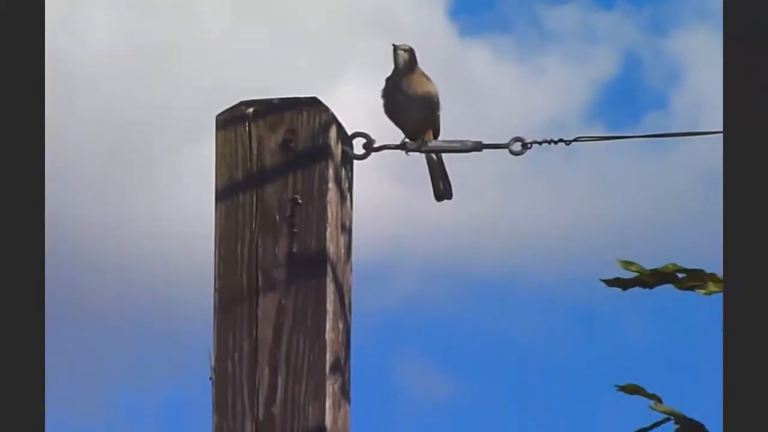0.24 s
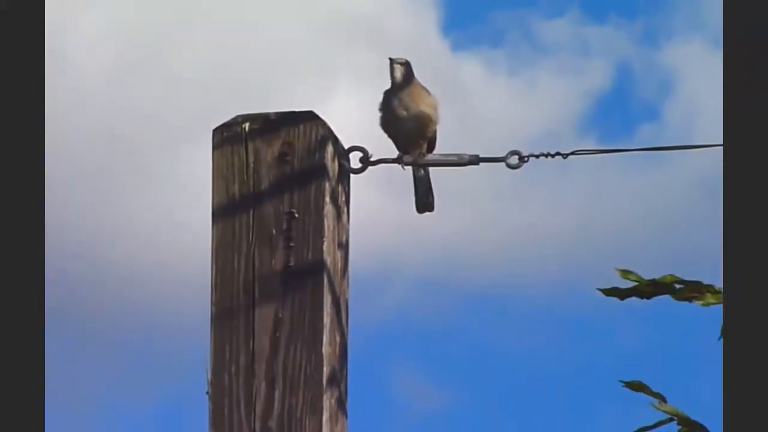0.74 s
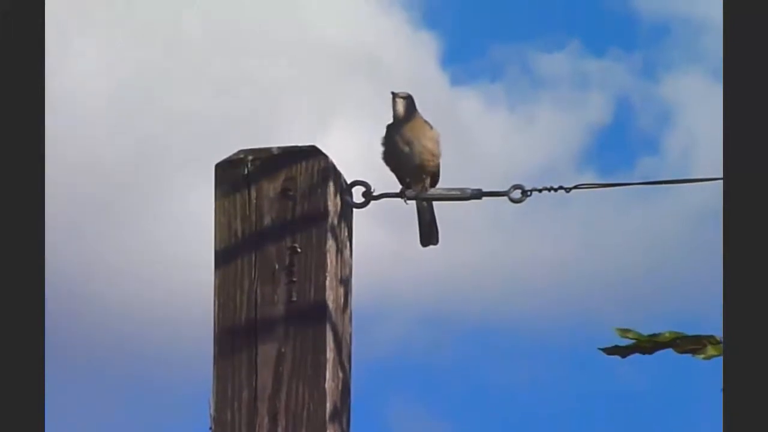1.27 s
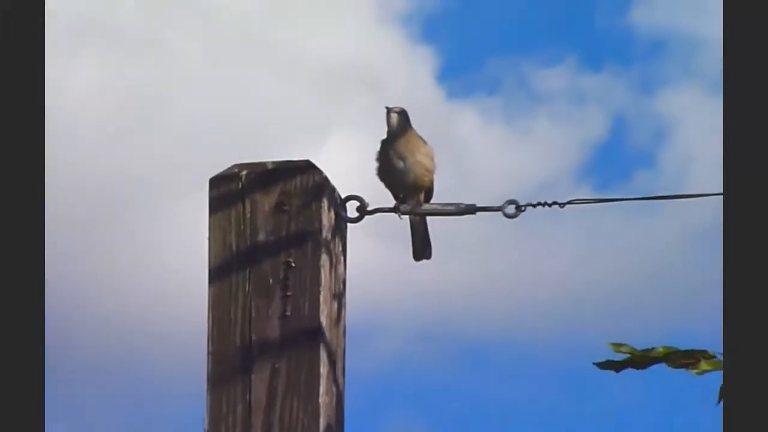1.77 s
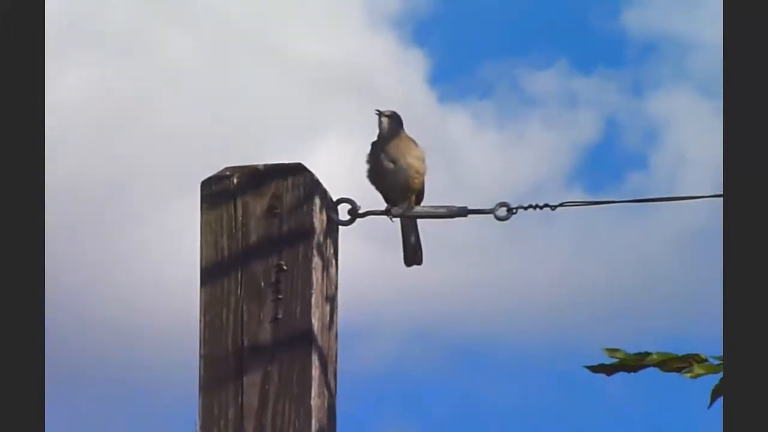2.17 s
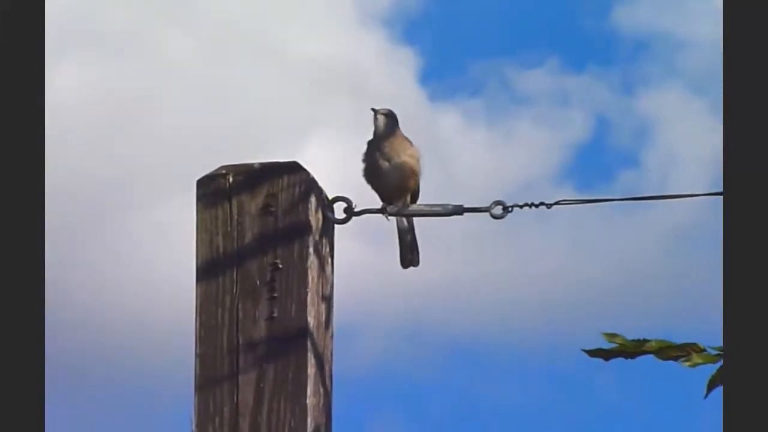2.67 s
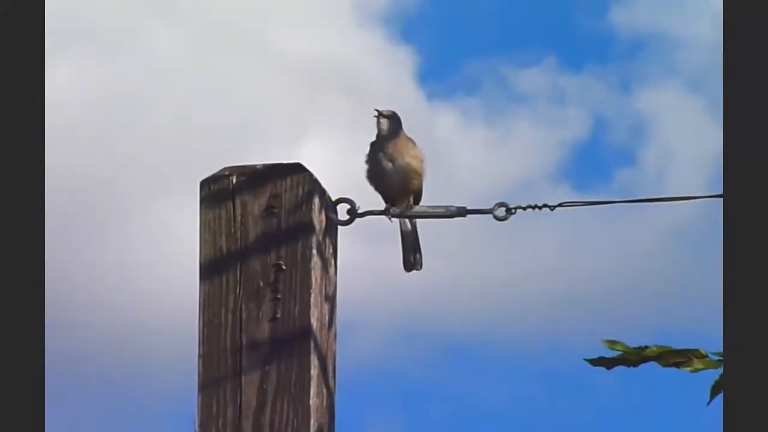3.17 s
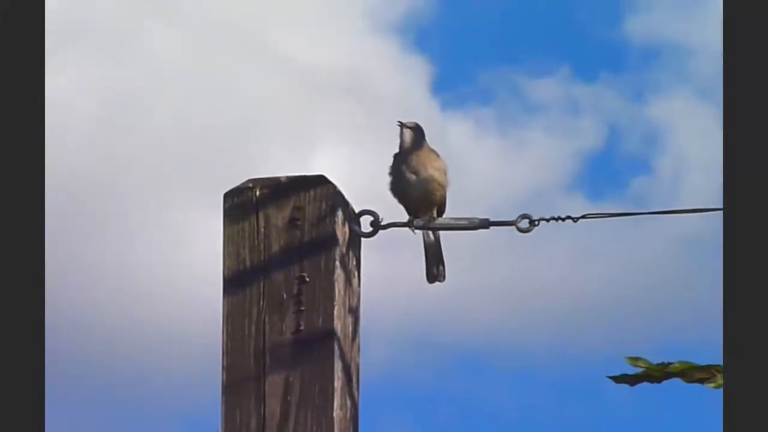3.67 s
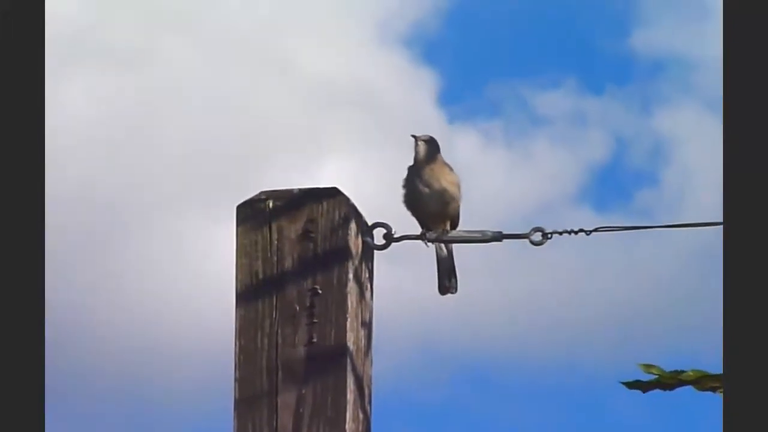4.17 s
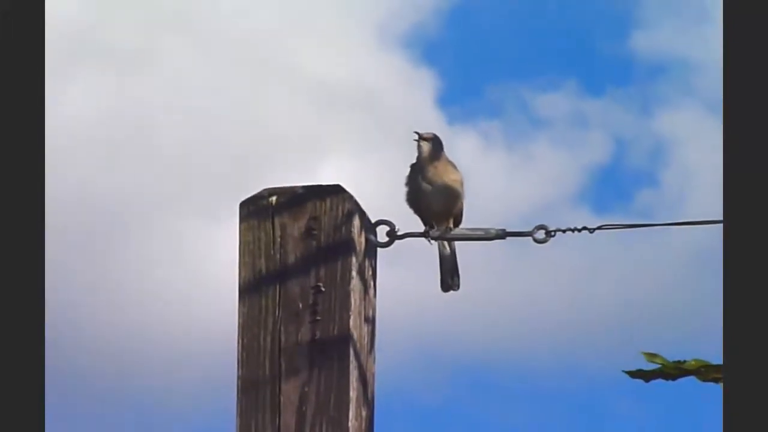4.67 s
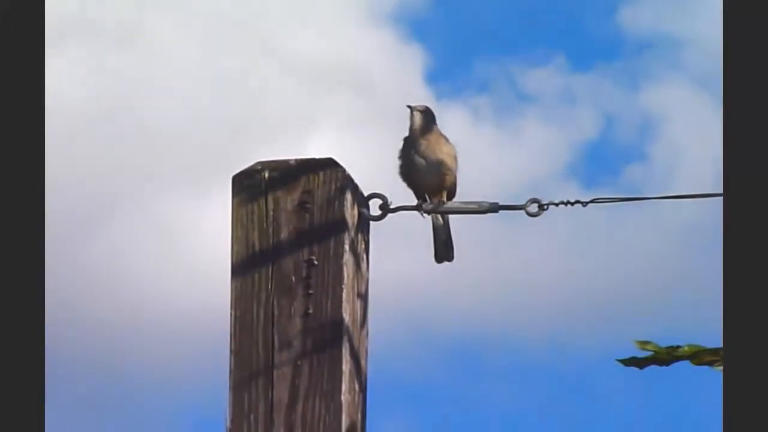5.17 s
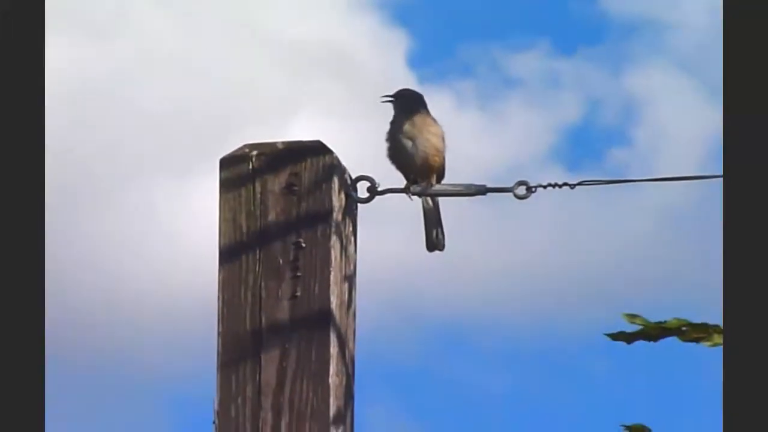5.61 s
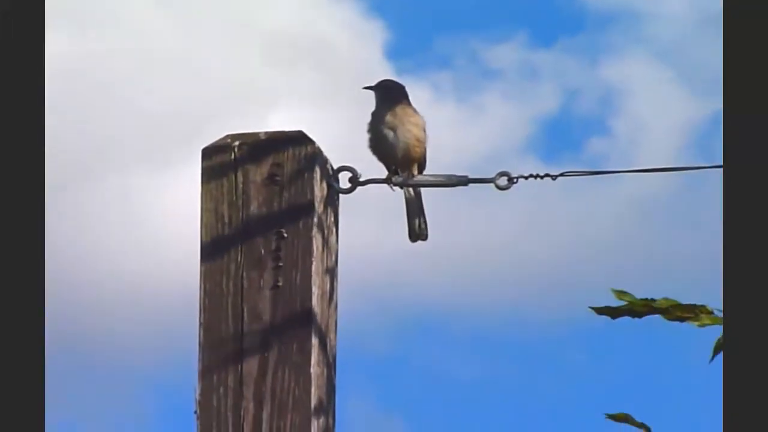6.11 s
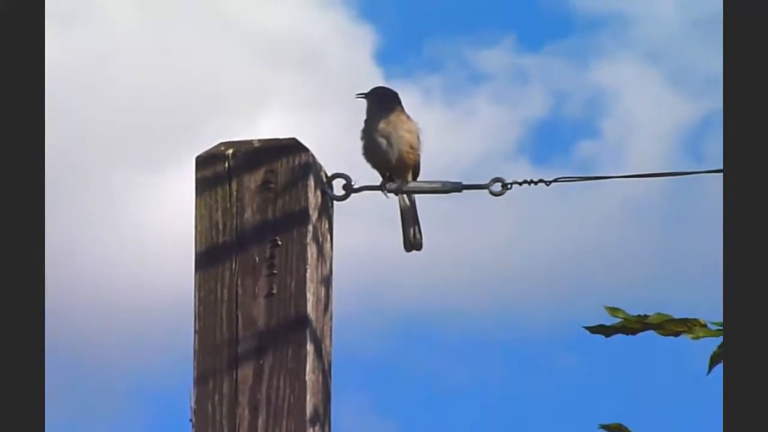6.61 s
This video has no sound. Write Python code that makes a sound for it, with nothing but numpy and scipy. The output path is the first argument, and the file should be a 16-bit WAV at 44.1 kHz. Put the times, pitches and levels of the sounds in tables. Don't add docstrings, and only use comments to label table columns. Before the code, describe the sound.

Outdoors, broad distant traffic roar with low engine drones runs throughout, beneath faint air hiss and a high cricket trill. After almost a second a perched songbird gives a soft row of ticks, then raspy chatter, bursts of rising chirps, and long rough sliding whistles, pausing between phrases. A last short wavering note closes it. A modest camera microphone catches the bird at some distance, with slight open-air echoes and a grainy treble.

```python
import sys
import numpy as np
from scipy import signal
from scipy.fft import rfft, irfft, next_fast_len
from scipy.io import wavfile
from scipy.ndimage import uniform_filter1d

SR = 44100
rng = np.random.default_rng(int(sys.argv[2]) if len(sys.argv) > 2 else 0)


def wrap_up_sound(samples):
    columns = np.atleast_2d(samples).T
    tamed = np.clip(columns, -1, 1)
    steps = np.round(tamed * 32767).astype(np.int16)
    wavfile.write(sys.argv[1], SR, steps)


def level_to_linear(level):
    exponent = np.asarray(level, float) / 20
    return 10 ** exponent


N = 302085
TIME = np.arange(N) / SR


def bird():
    return ticks() + rasp() + chatter() + chirps() + whistles()


# [t/s, peak level/dB, pitch f/Hz, reached f/Hz]
TICKS = [(0.8996, -27, 2310, 2950), (0.954, -25.5, 2400, 2380), (1.012, -30, 2520, 2700),
         (1.0671, -27, 2510, 2420), (1.1173, -28, 2430, 2450), (1.1712, -26.5, 2410, 2370),
         (1.223, -24.5, 2420, 2500), (1.28, -28, 2490, 2850), (1.334, -28, 2650, 2850),
         (1.3894, -26, 2440, 2900), (1.4494, -24, 2400, 2650), (1.5038, -25.5, 2300, 2450)]


def ticks():
    notes = []
    for s, db, hz, reach_hz in TICKS:
        start = (s, hz * 0.957, db - 4.5)
        middle = (s + 0.0028, hz, db - 1.5)
        end = (s + 0.0069, reach_hz, db - 9.5)
        notes.append([start, middle, end])
    return sing(notes, rough=0.59, breath_db=-33, octave_db=-6)


# [top t/s, flick from f/Hz, top f/Hz, fall to f/Hz, level/dB]
CHATTER = [(2.0135, 4010, 3800, 2480, -26), (2.043, 3640, 4010, 2600, -29), (2.057, 3890, 3990, 2730, -37),
           (2.102, 2950, 4140, 2450, -25), (2.132, 3990, 4030, 2480, -31), (2.146, 3500, 3600, 3300, -35),
           (2.199, 2840, 3820, 2540, -26), (2.225, 3580, 3850, 2520, -31), (2.236, 2840, 2950, 2320, -32),
           (2.28, 2750, 4270, 2480, -25), (2.315, 3300, 3960, 2500, -28), (2.329, 2940, 3400, 2400, -31),
           (2.399, 2580, 3540, 2240, -24.5), (2.436, 3200, 4320, 2500, -30), (2.452, 2700, 4250, 2940, -31),
           (2.504, 2720, 4700, 2900, -26), (2.516, 4420, 4640, 2620, -32), (2.538, 2560, 4700, 2940, -31),
           (2.547, 3490, 3580, 2610, -33)]


def chatter():
    return sing(flicks(CHATTER), rough=1.8, breath_db=-21, octave_db=-7.0)


FLICK_S, FALL_S = 0.0045, 0.007
FLICK_DB, TOP_DB, LANDING_DB = -5, -1, -5
SHADOW_S, SHADOW_RISE, SHADOW_DB = 0.0057, 1.12, -13


def flicks(rows):
    notes = []
    for s, from_hz, top_hz, to_hz, db in rows:
        notes.append(np.array([
            (s - FLICK_S, from_hz, db + FLICK_DB),
            (s, top_hz, db + TOP_DB),
            (s + FALL_S / 2, (top_hz + to_hz) / 2, db),
            (s + FALL_S, to_hz, db + LANDING_DB)]))
    shadows = [note[1:] * [1, SHADOW_RISE, 1] + [SHADOW_S, 0, SHADOW_DB] for note in notes]
    return notes + shadows


# [t/s, length/s, level/dB]
RASP = [(2.008, 0.012, -46), (2.036, 0.031, -35), (2.091, 0.016, -39), (2.13, 0.025, -46),
        (2.186, 0.017, -43), (2.22, 0.023, -42), (2.27, 0.011, -39), (2.306, 0.032, -33),
        (2.393, 0.02, -33), (2.422, 0.039, -37), (2.492, 0.035, -33), (2.529, 0.03, -36)]
# [f/Hz, level/dB per Hz]
RASP_COLOUR = [(1800, -29), (2400, -1), (3600, 0.5), (4500, -5), (5500, -18), (6500, -39)]


def rasp():
    level = np.zeros(N)
    for s, span, db in RASP:
        level += level_to_linear(db) * np.sin(np.pi * np.clip((TIME - s) / span, 0, 1))
    grain = level_to_linear(3 * flutter(100, 400))
    return level * noise(RASP_COLOUR) * grain


# [t/s, length/s, from f/Hz, to f/Hz, peak level/dB]
CHIRPS = [(3.022, 0.016, 3120, 4040, -24.5), (3.05, 0.022, 2720, 4150, -24), (3.08, .019, 3340, 3800, -23),
          (3.17, 0.021, 2710, 4450, -21), (3.199, .016, 3260, 4170, -26), (3.221, 0.013, 2990, 4270, -25),
          (3.242, .010, 3330, 4000, -30), (3.287, .016, 3250, 4050, -26.5), (3.306, .008, 3900, 3980, -34),
          (3.316, 0.014, 2750, 4100, -27), (3.33, 0.0062, 3500, 2750, -32),
          (3.335, 0.011, 2710, 3800, -22.5), (3.343, 0.022, 3690, 4020, -24.5),
          (3.044, 0.0083, 3080, 2650, -27.5), (3.1, 0.019, 3420, 3700, -41),
          (3.999, 0.02, 2780, 4170, -19.5), (3.37, .012, 3100, 3950, -24), (3.364, .007, 4000, 3100, -31),
          (3.385, 0.013, 3130, 3530, -30.5), (3.251, .007, 4050, 3100, -35)]
# [t/s, length/s, from f/Hz, to f/Hz, peak level/dB]
LATER_CHIRPS = [(3.62, 0.028, 3200, 4330, -22), (3.653, 0.019, 3400, 4300, -26),
                (3.677, 0.013, 3380, 4050, -24), (3.732, 0.026, 3210, 4190, -21),
                (3.767, 0.016, 3230, 4310, -21), (3.791, 0.016, 3380, 4300, -23.5),
                (3.81, 0.0097, 3020, 3740, -24), (3.869, 0.024, 3380, 4320, -18),
                (3.902, 0.024, 3180, 4050, -19), (3.934, .016, 3320, 3580, -27),
                (4.055, 0.011, 3850, 4800, -32), (4.026, 0.018, 3550, 3900, -17),
                (4.046, 0.016, 3345, 3930, -18.5), (4.066, 0.0112, 3170, 3800, -22.5),
                (4.077, 0.0058, 3230, 3540, -19), (4.088, 0.0075, 3300, 3660, -33)]


def chirps():
    notes = glides(CHIRPS, bend=1.63) + glides(LATER_CHIRPS, bend=1.23)
    return hoarse(sing(notes, rough=1.0, breath_db=-27, octave_db=1.0), spray_db=-20)


def hoarse(voice, spray_db):
    loudness = np.sqrt(np.abs(uniform_filter1d(voice ** 2, SR // 150)))
    return voice + level_to_linear(spray_db) * loudness * noise(RASP_COLOUR)


# [t/s, pitch f/Hz, level/dB]
WHISTLES = [
    [(4.492, 2680, -26), (4.513, 2650, -17.5), (4.524, 2894, -17), (4.55, 2914, -27), (4.605, 2940, -32),
     (4.64, 3320, -25.5), (4.68, 3304, -19.5), (4.72, 3616, -20), (4.729, 3800, -18.5)],
    [(4.831, 5030, -43), (4.84, 4590, -22.5), (4.88, 3700, -16.5), (4.9, 3140, -21.5), (4.912, 2980, -22.5),
     (4.923, 2880, -32)],
    [(4.958, 3570, -31), (4.972, 3640, -16), (4.982, 3590, -19), (4.994, 3300, -27)],
    [(5.422, 2450, -24), (5.429, 2600, -24), (5.441, 2400, -25), (5.449, 2620, -31)],
]
# [t/s, pitch f/Hz, level/dB]
LATER_WHISTLES = [
    [(5.445, 2590, -34), (5.46, 2810, -26), (5.48, 2900, -37.5), (5.54, 3080, -39.5), (5.57, 3320, -28.5),
     (5.6, 3610, -20), (5.637, 4285, -21), (5.65, 4260, -26.5)],
    [(5.762, 5040, -44), (5.77, 4740, -27), (5.79, 3970, -23.5), (5.83, 2970, -29.5), (5.85, 2684, -23.5),
     (5.868, 2650, -25), (5.875, 2500, -36)],
    [(6.763, 2380, -30), (6.775, 2490, -27.5), (6.788, 2890, -17), (6.793, 2710, -24), (6.799, 2900, -21),
     (6.805, 2800, -39)],
]
# [t/s, length/s, from f/Hz, to f/Hz, peak level/dB]
SLURS = [
    (4.727, .013, 3750, 4880, -28.5),
    (4.928, 0.029, 2950, 3730, -31),
    (4.992, 0.019, 2695, 2545, -24.5),
    (5.003, 0.017, 3320, 2760, -26),
    (6.751, 0.0085, 3820, 2640, -31.5),
]


def whistles():
    notes = WHISTLES + LATER_WHISTLES + glides(SLURS, bend=1.07)
    return sing(notes, rough=0.57, breath_db=-29.5, octave_db=8.0, swing=throb())


# [t/s, rate f/Hz, depth 0-1]
THROB = [(4.49, 170, .45), (4.503, 150, .05), (4.518, 140, .1), (4.545, 140, .55), (4.61, 140, .6),
         (4.635, 60, .45), (4.7, 60, .5), (4.72, 60, .2), (4.85, 110, .12), (5.47, 110, .6), (5.6, 90, .2)]


def throb():
    rate_hz, depth = in_time(THROB)
    turns = np.cumsum(rate_hz) / SR
    turns_at_dip = np.interp(4.670, TIME, turns)
    return -depth * np.cos(2 * np.pi * (turns - turns_at_dip)) * (TIME > THROB[0][0])


SWELL_SHARE, HOLD_SHARE = 0.44, 0.61
ONSET_DB, HOLD_DB, END_DB = -8, -1, -9


def glides(rows, bend):
    share = np.linspace(0, 1, 9)
    shape_db = np.interp(share, [0, SWELL_SHARE, HOLD_SHARE, 1], [ONSET_DB, 0, HOLD_DB, END_DB])
    notes = []
    for s, span, from_hz, to_hz, db in rows:
        pitch_hz = to_hz + (from_hz - to_hz) * (1 - share) ** bend
        notes.append(np.transpose([s + share * span, pitch_hz, db + shape_db]))
    return notes


# [pitch f/Hz, octave level/dB, roughness 0-1]
THROAT = [(2300, -26.5, 0.43), (2680, -34, 0.25), (2950, -44, 0.31), (3380, -51, 0), (3800, -40.5, 0.02),
          (4300, -41.5, 0), (4970, -46, 0.5)]


def sing(notes, rough, breath_db, octave_db, swing=np.zeros(N), edge_s=0.0019):
    out = np.zeros(N)
    shake, waver, husk = flutter(70, 370), flutter(40, 330), flutter(250, 850)
    throat_hz, throat_db, throat_rough = np.transpose(THROAT)
    late_swing = np.roll(swing, SR // 300)
    for note in notes:
        s, hz, db = np.transpose(note)
        at = np.arange(round((s[0] - edge_s) * SR), min(N, round((s[-1] + edge_s) * SR)))
        t = at / SR
        pitch = uniform_filter1d(np.interp(t, s, hz), SR // 500)
        uneven = rough * np.interp(pitch, throat_hz, throat_rough)
        shaken_hz = pitch + 120 * uneven * waver[at] - 110 * late_swing[at]
        phase = 2 * np.pi * np.cumsum(shaken_hz) / SR

        edges = np.clip(np.minimum(t - s[0], s[-1] - t) / edge_s + 1, 0, 1) ** 2
        airflow = 1 + swing[at] + uneven * shake[at] + level_to_linear(breath_db) * husk[at]
        airflow = airflow / np.sqrt(1 + uneven ** 2)

        settled_db = -15 * np.clip((t - s[0]) / 0.08, 0, 1) * (pitch < 3000)
        octave = level_to_linear(octave_db + settled_db + np.interp(pitch, throat_hz, throat_db))
        tone = np.sin(phase) + octave * np.sin(2 * phase)
        out[at] += np.sqrt(2) * level_to_linear(np.interp(t, s, db)) * edges * airflow * tone
    return out


def echoes(x, near_db, near_t60, far_db, far_t60):
    lag = TIME[:SR // 2]
    decay = level_to_linear(near_db - 60 * lag / near_t60) + level_to_linear(far_db - 60 * lag / far_t60)
    onset = np.clip(lag / 0.0014, 0, 1)
    tail = decay * rng.standard_normal(len(lag)) * onset / np.sqrt(0.018 * SR)
    stirred = x * (1 + 0.57 * flutter(9, 150))
    return signal.fftconvolve(stirred, tail)[:N]


STROKE_S = 0.0162


def cricket():
    out = np.zeros(N + SR)
    span = np.arange(-150, 200) / SR
    shape = np.exp(-0.5 * (span / np.where(span < 0, 0.0011, 0.0014)) ** 2)
    for s, strokes in trills():
        chance = rng.standard_normal((8, 3))
        for k in range(round(strokes)):
            stroke_s = s + k * STROKE_S + 0.00035 * chance[k, 0]
            at = SR // 2 + round(stroke_s * SR) - 150
            swell_db = -3.5 * (k == 0) - 0.5 * min(strokes - k, 3)
            db = -45.6 + swell_db + 0.24 * s + 1.1 * chance[k, 1]
            hz = 6930 + 40 * chance[k, 2]
            tone = np.sin(2 * np.pi * (hz - 20000 * span) * span)
            out[at:at + len(span)] += level_to_linear(db) * shape * tone
    return out[SR // 2:SR // 2 + N]


STROKE_SHARES = [.28, .52, .2]
REST_S, REST_SHRINKS_PER_S, REST_SPREAD_S = 0.023, 0.0017, 0.004


def trills():
    rows, s = [], 0.0
    while s < N / SR:
        strokes = rng.choice([2, 3, 4], p=STROKE_SHARES)
        rows.append((s, strokes))
        rest_s = REST_S - REST_SHRINKS_PER_S * s + REST_SPREAD_S * rng.standard_normal()
        s += strokes * STROKE_S + rest_s
    return rows


# [t/s, level/dB, brightness/dB per octave above 500 Hz]
TRAFFIC = [(0, -30, 0.5), (.7, -29.5, 1.1), (1.5, -29.5, -0.3), (2.3, -30.5, 0.35), (3.2, -31.5, -0.7),
           (3.9, -32.5, -0.94), (4.9, -33.5, -0.6), (5.6, -30.5, -0.8), (6.2, -30.5, 0), (6.85, -29.5, 0.8)]
# [f/Hz, level/dB per Hz]
ROAR = [(24, -41.5), (40, -15), (108, -4.5), (146, -3.5), (223, -4.5), (262, -7), (340, -4.5), (862, -4),
        (1550, -10), (2570, -22), (5000, -41.5), (6500, -63), (11000, -120)]
# [t/s, low level/dB, middle level/dB, high level/dB]
DRONES = [(0, -54, -35.5, -63), (.3, -50, -35, -67), (1.3, -44, -39, -60), (1.6, -39, -49, -60),
          (2.4, -55, -63, -62), (2.7, -34, -41, -53), (3.5, -50, -50, -58), (4.0, -39, -44, -56),
          (5.2, -40, -42, -54), (5.7, -37, -60, -41), (6.85, -38, -54, -42)]


def traffic():
    roar_db, tilt_db = in_time(TRAFFIC)
    roar = noise(ROAR)
    dull = coloured(roar, [(500, 0), (4000, -6)])
    bright = coloured(roar, [(500, 0), (4000, 3)])
    share = np.clip((tilt_db + 2) / 3, 0, 1)
    tyres = level_to_linear(roar_db + 2.5) * (share * bright + (1 - share) * dull)
    low_db, middle_db, high_db = in_time(DRONES)
    low = level_to_linear(low_db) * drone(94.5, 5.3)
    middle = level_to_linear(middle_db) * drone(118, 2.7)
    high = level_to_linear(high_db) * drone(215.5, 7.2)
    return tyres + low + middle + high


def drone(hz, width_hz):
    pitch = hz + width_hz / 2 * flutter(0.47, 4.3)
    level = 1 + 0.33 * flutter(0.48, 4)
    return level * np.sin(2 * np.pi * np.cumsum(pitch) / SR)


# [f/Hz, level/dB per Hz]
AIR = [(1500, -8), (3000, -5), (4500, -10), (5600, -13), (6900, -3.5), (7500, -14.5), (7900, -42),
       (8000, -55)]


def air():
    return level_to_linear(-55.5) * noise(AIR)


# [t/s, level/dB]
WIND = [
    (0, -59),
    (2.9, -51),
    (3.75, -51),
    (3.98, -39),
    (4.2, -43),
    (4.35, -56),
    (6.85, -55),
]


def wind():
    return level_to_linear(in_time(WIND)[0]) * flutter(32, 90)


def in_time(rows):
    s, *columns = np.transpose(rows)
    return [np.interp(TIME, s, c) for c in columns]


def coloured(x, spectrum):
    size = next_fast_len(N + SR // 4)
    hz, db = np.transpose(spectrum)
    bin_hz = np.arange(size // 2 + 1) * SR / size
    gain = level_to_linear(np.interp(np.log(bin_hz + 1), np.log(hz), db))
    return irfft(rfft(x, size) * gain, size)[:N]


def rms_one(x):
    return x / np.sqrt(np.mean(x ** 2) + 1e-20)


def noise(spectrum):
    return rms_one(coloured(rng.standard_normal(N), spectrum))


def flutter(low_hz, high_hz):
    band = signal.butter(2, [low_hz, high_hz], "band", fs=SR, output="sos")
    return rms_one(signal.sosfilt(band, rng.standard_normal(N)))


def scene():
    song = bird()
    chirr = cricket()
    song = song + echoes(song, near_db=-5.0, near_t60=0.12, far_db=-28.5, far_t60=0.76)
    chirr = chirr + echoes(chirr, near_db=1.5, near_t60=0.027, far_db=-30, far_t60=0.5)
    return (song + chirr + traffic() + air() + wind())[None]


def band_limit(x):
    return signal.sosfilt(signal.butter(12, 13290, fs=SR, output="sos"), x)


SAMPLING_HZ = 16000
# [f/Hz, level/dB]
PLAYBACK = [(20, 0.5), (7000, -1), (8000, -6.5), (9100, -6), (10500, -13), (12000, -22.5), (12250, -42),
            (12550, -72), (20000, -100)]


def record(dry):
    sampled = dry[0] * (1 + 2 * np.cos(2 * np.pi * SAMPLING_HZ * TIME))
    mix = coloured(sampled, PLAYBACK)[None]
    return band_limit(mix)


dry = scene()
out = record(dry)
wrap_up_sound(out)
```